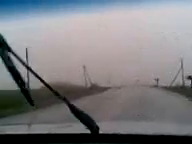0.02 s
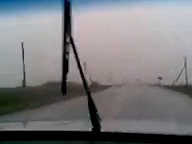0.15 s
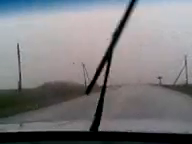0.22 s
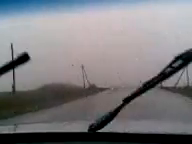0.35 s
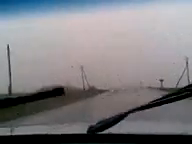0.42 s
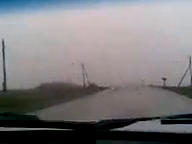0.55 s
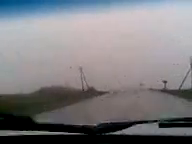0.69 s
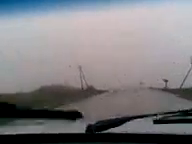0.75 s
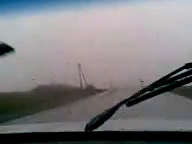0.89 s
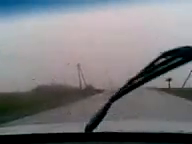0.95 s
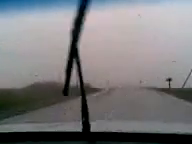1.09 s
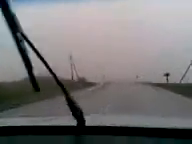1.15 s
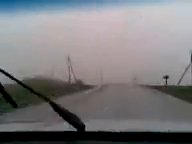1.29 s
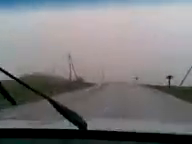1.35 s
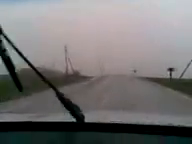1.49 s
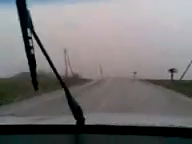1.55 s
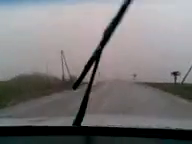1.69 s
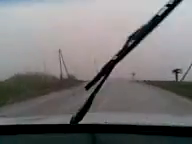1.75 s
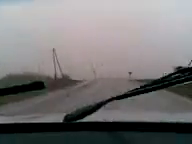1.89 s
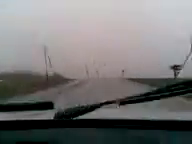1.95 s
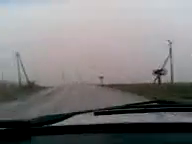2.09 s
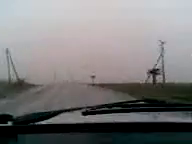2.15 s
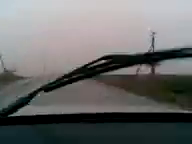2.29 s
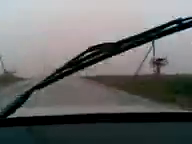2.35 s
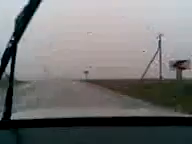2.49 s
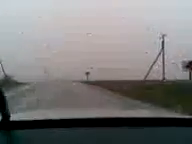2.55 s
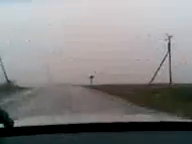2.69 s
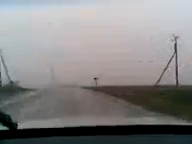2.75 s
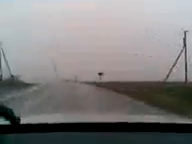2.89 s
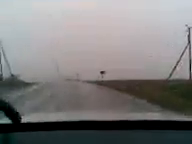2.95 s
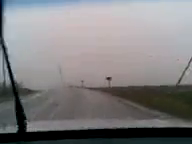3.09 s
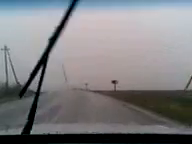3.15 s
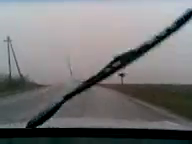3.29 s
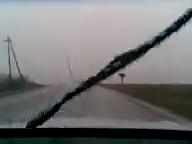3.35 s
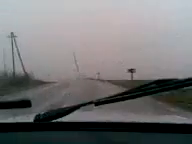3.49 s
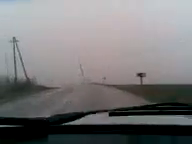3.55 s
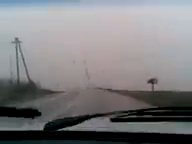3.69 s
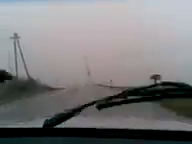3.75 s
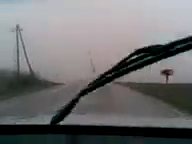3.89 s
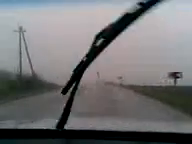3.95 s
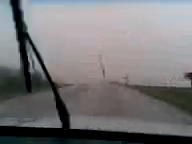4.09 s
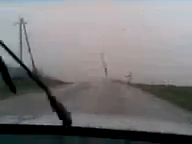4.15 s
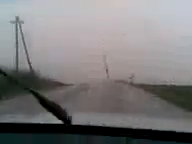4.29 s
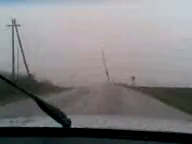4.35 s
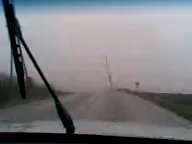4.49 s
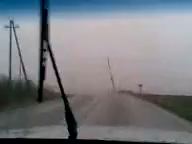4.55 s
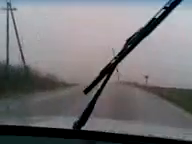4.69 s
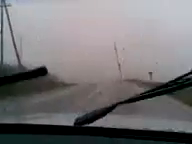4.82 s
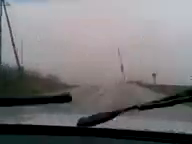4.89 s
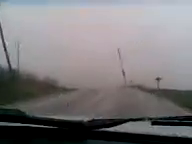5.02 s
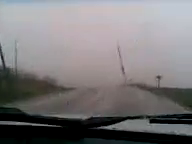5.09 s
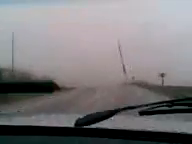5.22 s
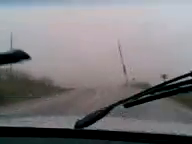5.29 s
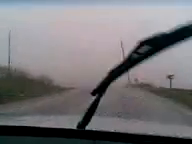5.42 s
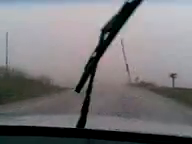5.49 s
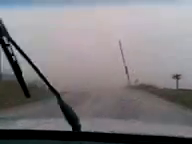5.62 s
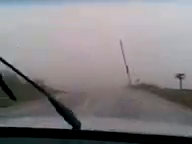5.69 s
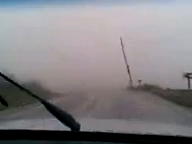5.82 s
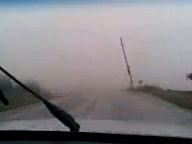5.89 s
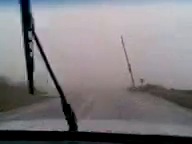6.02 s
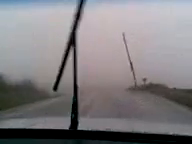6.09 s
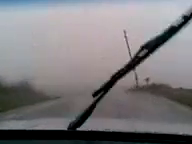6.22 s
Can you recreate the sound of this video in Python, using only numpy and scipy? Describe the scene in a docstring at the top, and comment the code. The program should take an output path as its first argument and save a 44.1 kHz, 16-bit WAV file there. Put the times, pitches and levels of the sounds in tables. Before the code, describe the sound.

From behind the windshield of a moving car, a low tyre rumble and uneven cabin boom carry on throughout. Over them, fast wipers click sharply about every three quarters of a second, alternate turns landing with an extra knock. Each click starts a wet rubber swish and a motor hum that ease off before the next. A faint drivetrain whine slowly drops. The cabin sounds small and padded, the microphone close and narrow in range.

```python
"""Fast windshield wipers, heard inside a car on a wet road. Tyres rumble and the body booms throughout.
First the two blades flip over with a snap and a scuff, and the arms knock at the top of the sweep.
The stroke then sets off with a wet swish of rubber on glass and a labouring motor, and eases off.
About every 0.73 s the blades flip into a new stroke; the knock returns on every second turn.
Over the whole scene a thin drivetrain whine sinks as the car slows."""
import sys
import numpy as np
from scipy import signal
from scipy.fft import rfft, irfft
from scipy.io import wavfile

SR = 44100
rng = np.random.default_rng(int(sys.argv[2]) if len(sys.argv) > 2 else 0)


def log_audio(samples):
    """Write samples as a 16-bit WAV file to the path given in sys.argv[1]."""
    # one column per channel
    frames = np.atleast_2d(samples).T
    # limit to full scale, then quantise
    limited = np.clip(frames, -1, 1)
    pcm = np.round(limited * 32767).astype(np.int16)
    wavfile.write(sys.argv[1], SR, pcm)


N = 275625
TIME = np.arange(N) / SR
FREQS = np.fft.rfftfreq(N, 1 / SR)

# EQ curves for the noise layers: f/Hz, relative level/dB
TYRE_EQ = [(20, -38.5), (40, -20), (62, -2.5), (90, 2), (150, -2), (280, 2), (320, 2), (370, -1),
           (600, -9.5), (1200, -16.5), (2500, -49.5)]
BODY_EQ = [(60, -37), (95, -7.5), (118, 5), (150, 2), (185, 2), (215, -3.5), (245, -1), (290, -10.5),
           (370, -10.5), (600, -55)]
MOTOR_EQ = [(200, -16), (350, -5), (480, 2.5), (560, -3.5), (660, 1.5), (880, 1), (1030, 2), (1120, -4),
            (1300, -7.5), (1600, -23.5), (2500, -63.5)]
RUBBER_EQ = [(700, -22), (1300, -0.5), (1900, 0.5), (2300, 3.5), (2600, 2.5), (2900, -2.5), (3400, -19.5),
             (4400, -47)]
SPRAY_EQ = [(2000, -19), (2800, -5.5), (3200, 5), (3600, 0), (3900, -7.5), (4300, -20), (4700, -41.5)]
SCUFF_EQ = [(900, -23.5), (1450, -3.5), (1900, 2.5), (2500, -1), (2850, 2), (3100, -22), (3600, -1.5),
            (4000, -16), (4600, -32)]
# fader rides for tyre roar, body boom and drivetrain whine: t/s, relative level/dB
ROAR_FADER = [(0, -40.5), (1.85, -41), (2.2, -47), (3.1, -42), (3.85, -41.5), (5.5, -41.5), (5.85, -42.5),
              (6.25, -42)]
BOOM_FADER = [(0.0, -39), (0.01, -38), (0.57, -36.5), (0.61, -44), (0.68, -28), (0.77, -43), (0.91, -31.5),
              (0.99, -41), (1.3, -32.5), (1.79, -39), (2.02, -31.5), (2.05, -49), (2.1, -36), (2.65, -34.5),
              (2.79, -41.5), (2.89, -35), (3.06, -43.5), (3.29, -33.5), (3.57, -46), (3.78, -34.5),
              (5.34, -41.5), (5.41, -33), (5.97, -41.5), (6.15, -32.5), (6.2, -39), (6.25, -36)]
WHINE_FADER = [(0, -47), (2.0, -42), (2.85, -52.5), (3.2, -41), (3.55, -46.5), (3.9, -41), (4.3, -44.5),
               (4.7, -42.5), (6.25, -46)]
# low resonances of the cabin air: f/Hz, width/Hz, relative level/dB
AIR_MODES = [(121.9, 7.4, -9.5), (182.8, 18, -7.5), (236, 23, -10.5)]
# dull thuds of the body on the road: t/s, relative level/dB, f/Hz, rise/s
ROAD_THUDS = [(1.681, -25, 432, 0.02), (2.004, -32.5, 172.2, 0.042), (3.848, -23.5, 432.5, 0.04),
              (4.714, -30, 399.5, 0.046)]
# narrow resonances shaken by the wiper drive: f/Hz, width/Hz, level at average load/dB
DRIVE_HUMS = [(430.4, 11, -46.5), (697, 4.4, -58.5), (940.5, 81, -50.5), (1190, 5.3, -53.5)]
# the rubber briefly drags harder: t/s, swish boost/dB
RUBBER_DRAGS = [(.32, 2.5), (1.17, 6.5), (2.64, -0.5), (3.60, 6), (6.23, 4.5)]
# each turn and the stroke it starts: t/s, first snap/dB, second blade's lag/s, second snap/dB,
# scuff/dB, relative swish/dB, relative motor/dB, swish ease-off/dB
BLADE_TURNS = [(0.056, -5, 0.0048, -18, -26.5, -39, -34.5, 1),
               (.7834, -6.5, .0046, -9.5, -24, -40.3, -35.2, .5),
               (1.519, -5, 0.00512, -31, -29.5, -39.5, -35, 3.5),
               (2.2404, -5, 0.0084, -9.5, -22, -42, -36.5, 4),
               (2.9813, -10, 0.00433, -19, -25.5, -41.5, -36, 6),
               (3.7287, -7.5, 0.0098, -15, -21.5, -40.5, -34.5, 4.5),
               (4.4757, -8.5, .0027, -12.5, -28.5, -40.5, -35, 4),
               (5.2121, -5, .0072, -4, -25, -40.5, -36, 6), (5.9372, -14, .0019, -11, -34, -41, -34, 1.5)]
# arms reaching the top of the sweep: t/s, level/dB, f/Hz, metal clink/dB, settling tick lag/s, tick/dB
ARM_KNOCKS = [(.0730, -2.5, 2090, -28.5, 0.0059, -14), (1.534, -4, 2140, -22.5, 0.01, -23),
              (2.9983, -3, 2050, -15.5, 0.005, -17), (4.4898, -1.5, 2136, -24.5, 0.00326, -10),
              (5.9633, -4.5, 2080, -20, 0.004, -16)]
# ring of a wiper arm: f/Hz, relative level/dB, t60/s
ARM_MODES = [(1835, -32.5, .03), (1930, -26, 0.033), (2225, -34, 0.032), (2440, -26, 0.045),
             (2750, -22.5, 0.034), (3130, -28.5, .03), (3260, -32, 0.039)]
# early reflections off glass and dashboard: delay/s, level/dB
REFLECTIONS = [(.0037, -18), (.0070, -18.5)]

WHINE_HZ, WHINE_SAG_HZ_PER_S = 847, 5.1
HOLD_S, EASE_S = 0.3, .25  # a stroke holds its level, then eases off
MOTOR_EASE, SPRAY_EASE = 0.86, 1.48  # ease-off as a multiple of the swish's
MOTOR_START_DB, SPRAY_DB, DRAG_RISE_S = -0.5, -8, 0.045
SPLASH_DB, SPLASH_S = 10, 0.05  # extra swish as the blades set off through the gathered water
SCUFF_LAG_S, SCUFF_RISE_S = 0.0051, 0.013
SNAP_HZ, SNAP_RISE_S = 2450, 0.001
LIFT_LEAD_S, LIFT_DB, LIFT_HZ = .0019, -15, 2180  # the rubber lip lets go just before its snap
TOUCH_LEAD_S, TOUCH_DB, TOUCH_HZ = 0.001965, -15.5, 3150  # the joint's play closes before the knock
REBOUND_S, SETTLE_HZ = 0.00155, 2350
SHAKE_LAG_S, SHAKE_RISE_S, SHAKE_DB, SHAKE_HZ = 0.023, 0.0088, -38.5, 930  # linkage thud after a turn
JOLT_LAG_S, JOLT_RISE_S, JOLT_DB, JOLT_HZ = .043, .022, -35, 1046  # the body answers each knock


def amp(db):
    """Decibels to gain."""
    return 10 ** (np.asarray(db) / 20)


def unit(x):
    """Scales to rms 1."""
    return x / np.sqrt(np.mean(x ** 2) + 1e-20)


def follow(fader):
    """A fader's level in dB at every sample."""
    return np.interp(TIME, *np.transpose(fader))


def add(mix, s, sound):
    """Mixes a sound in at time s."""
    part = mix[max(round(s * SR), 0):][:len(sound)]
    part += sound[:len(part)]


def colour(x, eq):
    """Shapes x with an EQ curve, at rms 1."""
    hz, db = np.transpose(eq)
    gain = amp(np.interp(np.log(FREQS + 1), np.log(hz), db))
    return unit(irfft(rfft(x) * gain, N))


def wander(rate_hz):
    """Random modulation of rms 1, up to about the given rate."""
    return unit(irfft(rfft(rng.standard_normal(N)) / (1 + (FREQS / rate_hz) ** 2), N))


def fuzzy_tone(hz, width_hz, steady=0):
    """A narrow resonance shaken at random, with an optional steady part; rms 1."""
    phase = 2 * np.pi * np.cumsum(hz * np.ones(N)) / SR
    return unit((steady + wander(width_hz)) * np.cos(phase) + wander(width_hz) * np.sin(phase))


def swell(t, rise, order=3):
    """Envelope of a heavily damped blow that peaks at t = 0."""
    u = np.maximum(1 + t / rise, 0)
    return (u * np.exp(1 - u)) ** order


def strike(mix, s, db, hz, rise=SNAP_RISE_S):
    """Mixes in a few cycles of a hard contact, peaking at time s."""
    t = np.arange(-SR // 100, SR // 100) / SR
    click = amp(db) * swell(t, rise, order=8) * np.cos(2 * np.pi * hz * t)
    add(mix, s + t[0], click)


def road():
    """The bed: tyre roar, and the body booming with the lumps of the road."""
    air = sum(amp(db) * fuzzy_tone(hz, width) for hz, width, db in AIR_MODES)
    lumps_db = 1.3 * wander(8)
    body = colour(rng.standard_normal(N), BODY_EQ)
    boom = (body + air) * amp(follow(BOOM_FADER) - 2.0 + lumps_db)
    roar = colour(rng.standard_normal(N), TYRE_EQ) * amp(follow(ROAR_FADER))
    return boom + roar


def drivetrain():
    """A thin whine that sinks in pitch as the car slows."""
    hz = WHINE_HZ - WHINE_SAG_HZ_PER_S * TIME
    return fuzzy_tone(hz, width_hz=9.7, steady=0.97) * amp(follow(WHINE_FADER))


def thuds():
    """Soft blows from the road, the turns and the knocks, each shaking one broad, dull resonance."""
    bumps = [(s, db - 5, hz, rise) for s, db, hz, rise in ROAD_THUDS]
    shakes = [(s + SHAKE_LAG_S, SHAKE_DB, SHAKE_HZ, SHAKE_RISE_S) for s, *_ in BLADE_TURNS]
    jolts = [(s + JOLT_LAG_S, JOLT_DB, JOLT_HZ, JOLT_RISE_S) for s, *_ in ARM_KNOCKS]
    return sum(amp(db) * swell(TIME - s, rise) * fuzzy_tone(hz, width_hz=0.16 * hz)
               for s, db, hz, rise in bumps + shakes + jolts)


def stroke():
    """Stroke envelopes: swish/dB, motor/dB, ease-off so far/dB, and the surge of setting off (1 to 0)."""
    start, *_, swish_db, motor_db, ease_db = np.transpose(BLADE_TURNS)
    which = np.searchsorted(start, TIME)
    # an average stroke is under way before the first turn
    age = TIME - np.r_[start[0] - np.diff(start).mean(), start][which]
    swish_db, motor_db, ease_db = (np.r_[db.mean(), db][which] for db in (swish_db, motor_db, ease_db))
    eased_db = ease_db * np.clip((age - HOLD_S) / EASE_S, 0, 1)
    return swish_db, motor_db, eased_db, np.exp(-age / SPLASH_S)


def wiper_motor():
    """The wiper drive whirrs and hums as it labours unevenly through each stroke."""
    _, motor_db, eased_db, surge = stroke()
    load_db = motor_db - MOTOR_EASE * eased_db + MOTOR_START_DB * surge + wander(14)
    whirr = colour(rng.standard_normal(N), MOTOR_EQ) * amp(load_db - 1.54)
    hums = sum(amp(db) * fuzzy_tone(hz, width) for hz, width, db in DRIVE_HUMS)
    return whirr + hums * amp(load_db - load_db.mean())


def swish():
    """Rubber slides over wet glass in countless tiny slips, pushing a fine spray ahead."""
    level_db, _, eased_db, surge = stroke()
    level_db = level_db + sum(db * swell(TIME - s, DRAG_RISE_S) for s, db in RUBBER_DRAGS)
    swish_db = level_db - eased_db + SPLASH_DB * surge
    spray_db = level_db + SPRAY_DB - SPRAY_EASE * eased_db + 0.33 * SPLASH_DB * surge
    slips = rng.standard_normal(N) * amp(1.4 * wander(110) + 1.5 * wander(8.5))
    rubber = colour(slips, RUBBER_EQ) * amp(swish_db - 1.0)
    # now and then the rubber catches and sings faintly
    squeak = sum(fuzzy_tone(hz, width_hz=69) * amp(swish_db - 17 + 4.2 * wander(15))
                 for hz in (2290, 2600))
    fizz = rng.standard_normal(N) * amp(wander(150) + 2.8 * wander(11))
    spray = colour(fizz, SPRAY_EQ) * amp(spray_db)
    return rubber + squeak + spray


def scuffs():
    """Each rubber lip scuffs the glass as it rolls over along its length."""
    envelope = sum(amp(db) * swell(TIME - s - SCUFF_LAG_S, SCUFF_RISE_S)
                   for s, _, _, _, db, *_ in BLADE_TURNS)
    return envelope * colour(rng.standard_normal(N), SCUFF_EQ)


def snaps_and_knocks():
    """The blades snap over at each turn, the arms knock and rebound at the top; every hit rings them."""
    hits = np.zeros(N)
    for s, first_db, lag, second_db, *_ in BLADE_TURNS:
        strike(hits, s - LIFT_LEAD_S, first_db + LIFT_DB, LIFT_HZ)
        strike(hits, s, first_db, SNAP_HZ)
        strike(hits, s + lag, second_db, SNAP_HZ)
    for s, db, hz, clink_db, settle_lag, settle_db in ARM_KNOCKS:
        strike(hits, s - TOUCH_LEAD_S, TOUCH_DB, TOUCH_HZ)
        strike(hits, s, db, hz, rise=0.0011)
        strike(hits, s + REBOUND_S, db - 1.0, hz, rise=0.0021)
        strike(hits, s + REBOUND_S, clink_db, hz=3410, rise=0.0047)
        strike(hits, s + settle_lag, settle_db, SETTLE_HZ)
    t = np.arange(SR // 8) / SR
    ring = sum(amp(db - 60 * t / t60) * np.sin(2 * np.pi * hz * t) for hz, db, t60 in ARM_MODES)
    return hits + amp(-28.5) * signal.fftconvolve(hits, ring)[:N]


def cabin(x, wet_db, t60):
    """Two close reflections, then the short tail of a padded cabin, a little different at each turn."""
    out = x.copy()
    for delay, db in REFLECTIONS:
        add(out, delay, amp(db) * x)
    t = np.arange(SR // 4) / SR
    for s, *_ in BLADE_TURNS:
        tail = rng.standard_normal(len(t)) * amp(-60 * t / t60) * (t > .003)  # 3 ms pre-delay
        start = round((s - .04) * SR)
        reverb = signal.fftconvolve(x[start:start + len(t)], tail / np.linalg.norm(tail))
        add(out, start / SR, amp(wet_db) * reverb)
    return out


def scene():
    """The mono mix from behind the windshield, with cabin reverb on the snaps and knocks."""
    layers = road() + wiper_motor() + drivetrain() + swish() + scuffs() + thuds()
    return (layers + cabin(snaps_and_knocks(), wet_db=-9, t60=.065))[None]


def record(dry):
    """A narrow-band microphone whose loudest peaks just clip, then a low-pass on the very top."""
    mic_lowpass = signal.firwin(301, cutoff=4500, window=("kaiser", 8), fs=SR)
    top_lowpass = signal.firwin(511, cutoff=16000, window=("kaiser", 9), fs=SR)
    narrow = signal.oaconvolve(dry, mic_lowpass[None], "same")
    clipped = np.clip(narrow, -.71, .71)
    return signal.oaconvolve(clipped, top_lowpass[None], "same")


dry = scene()
out = record(dry)
log_audio(out)
```